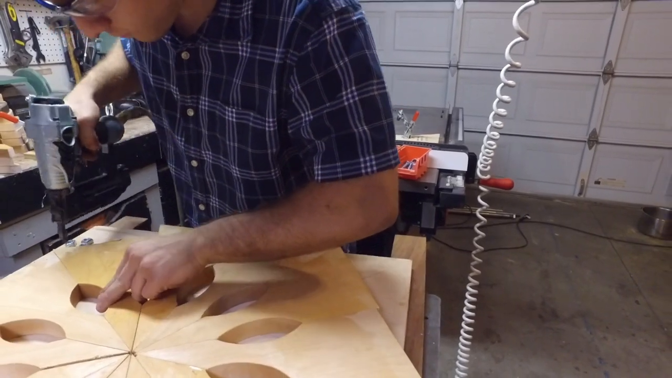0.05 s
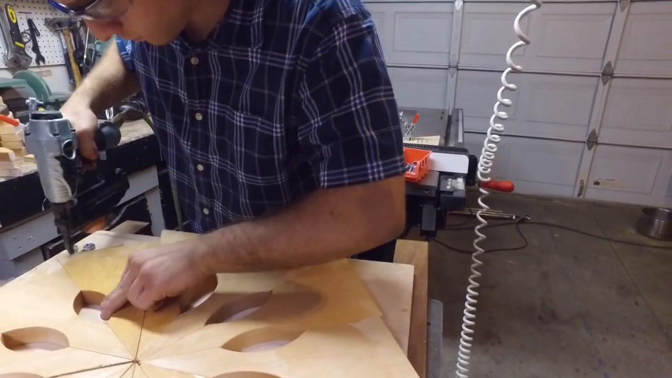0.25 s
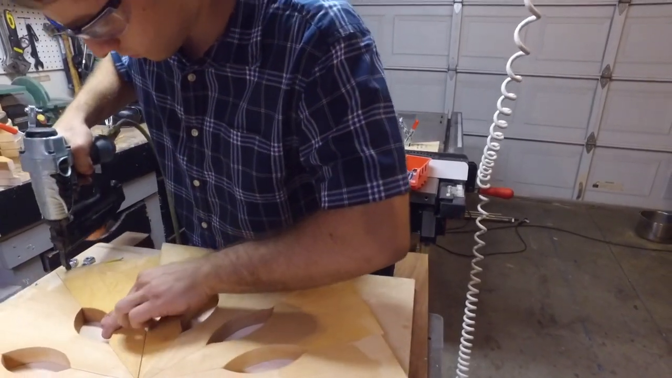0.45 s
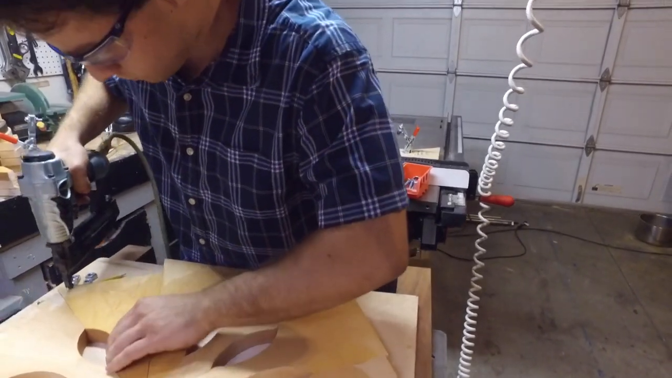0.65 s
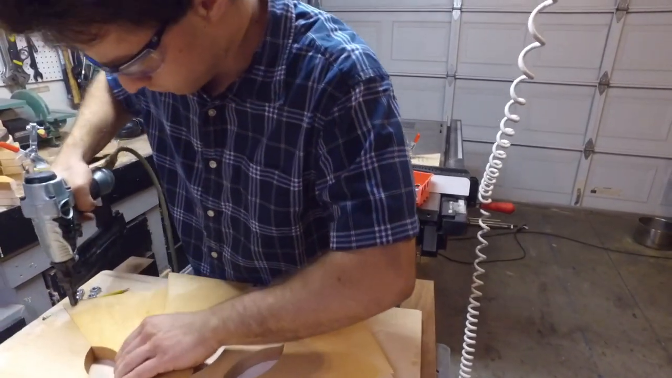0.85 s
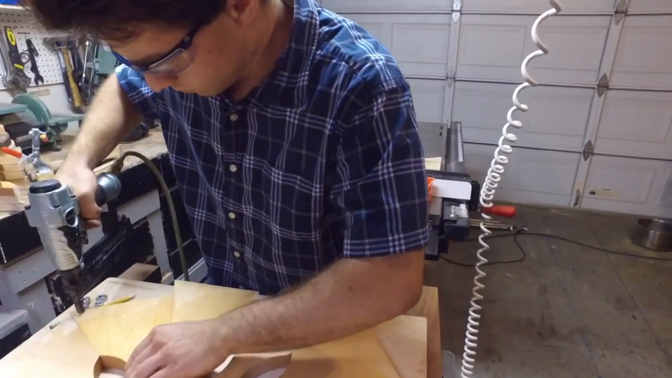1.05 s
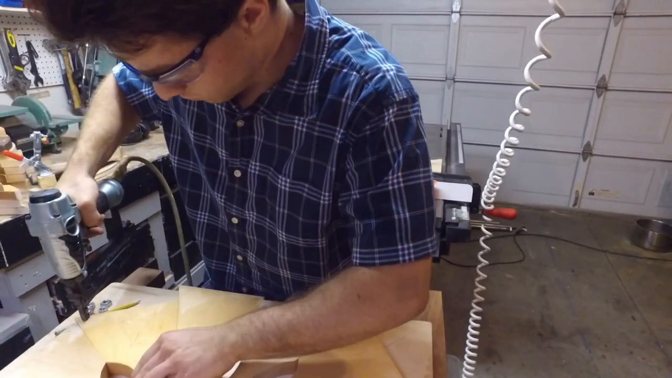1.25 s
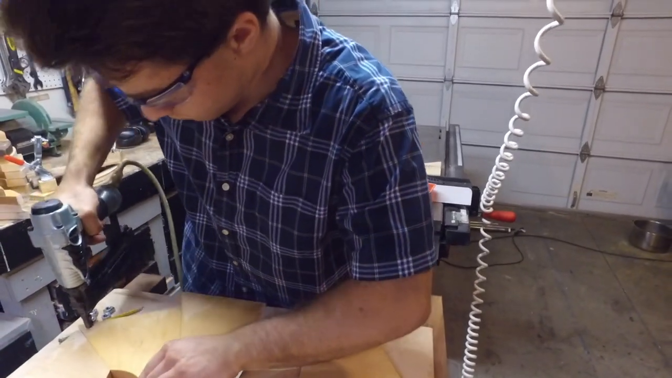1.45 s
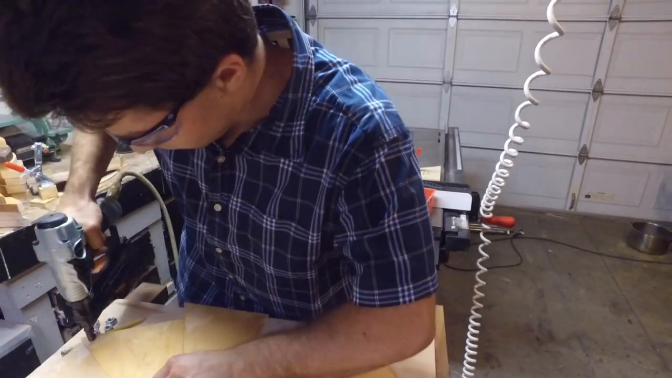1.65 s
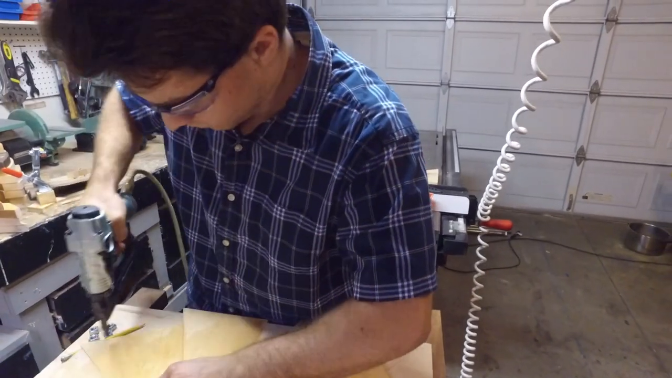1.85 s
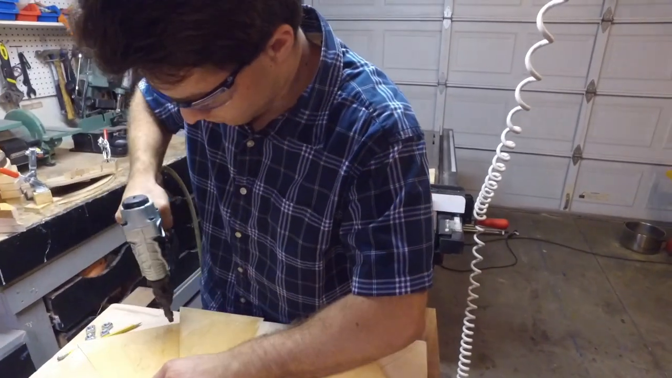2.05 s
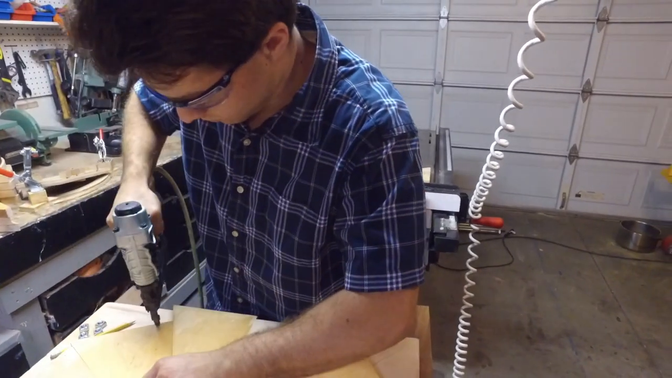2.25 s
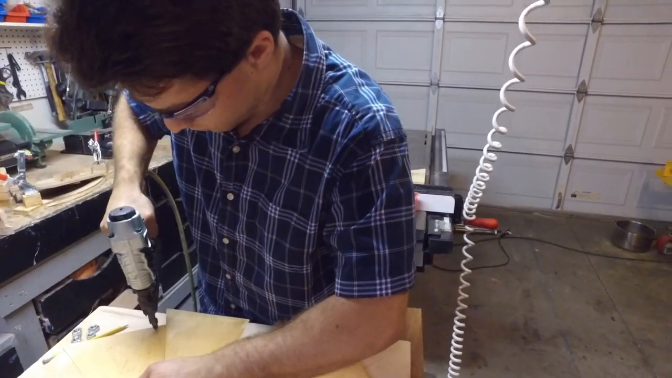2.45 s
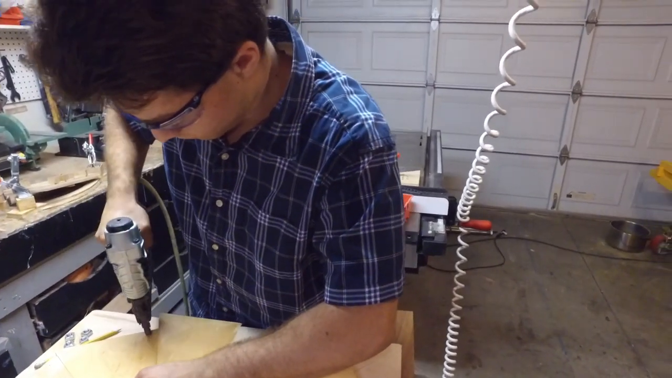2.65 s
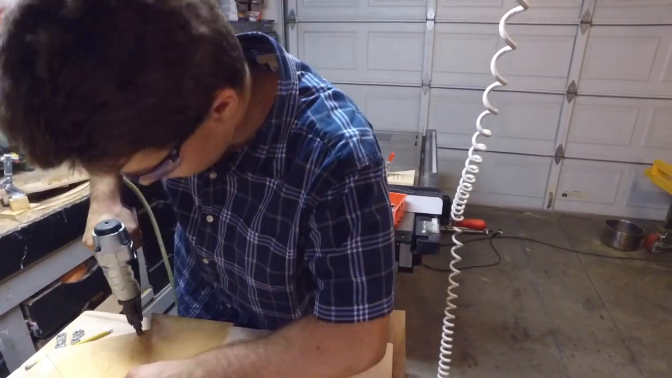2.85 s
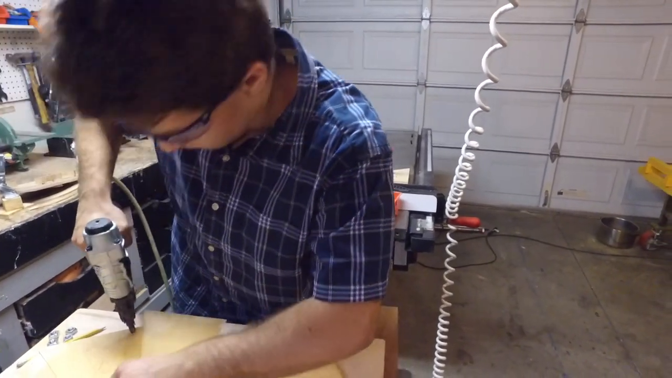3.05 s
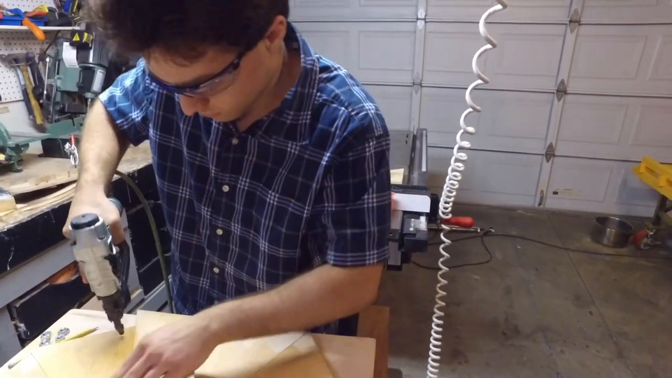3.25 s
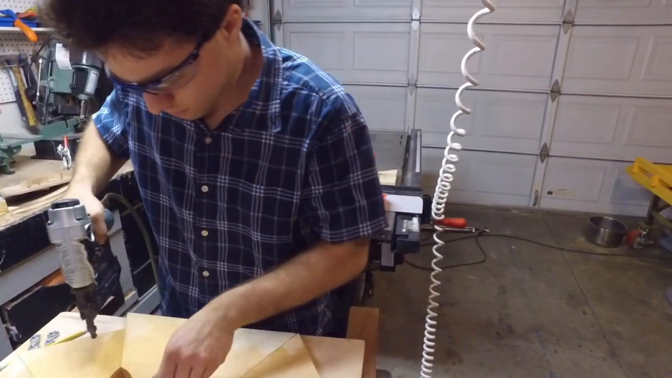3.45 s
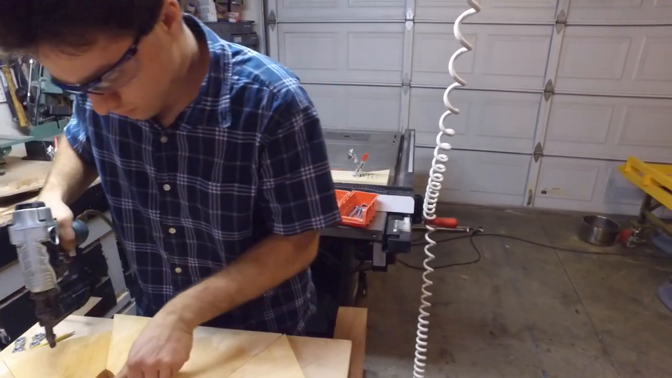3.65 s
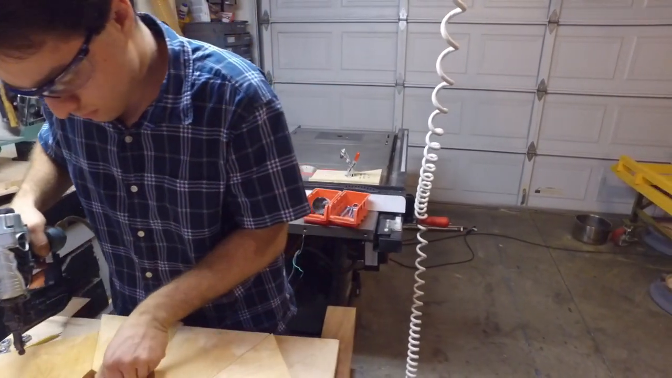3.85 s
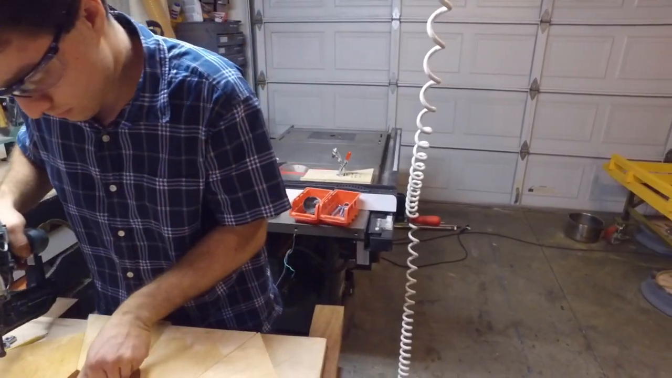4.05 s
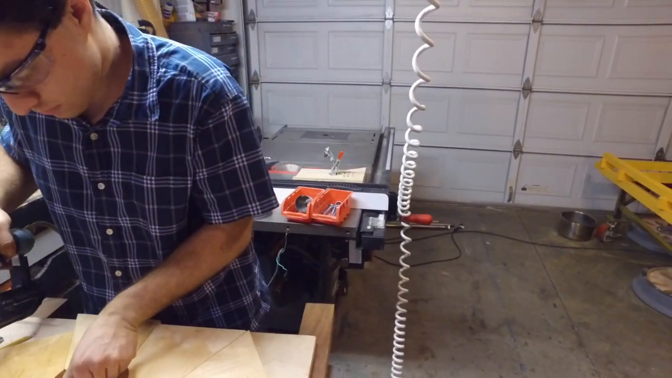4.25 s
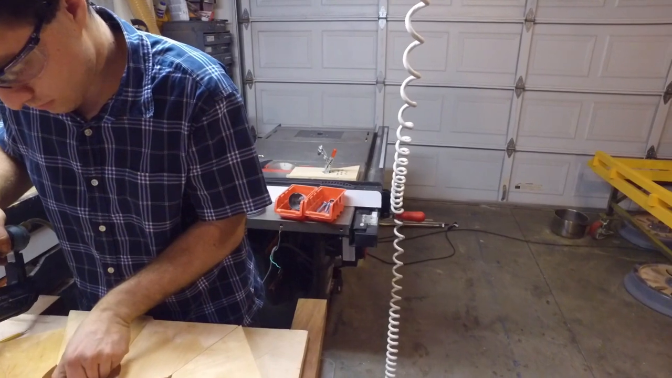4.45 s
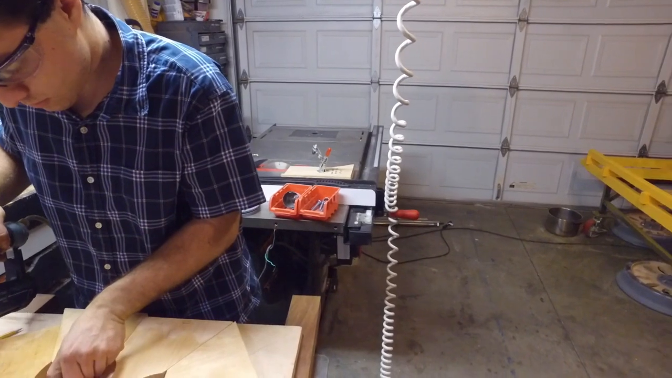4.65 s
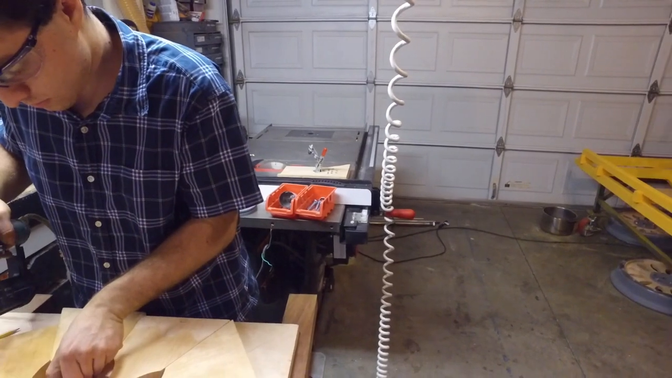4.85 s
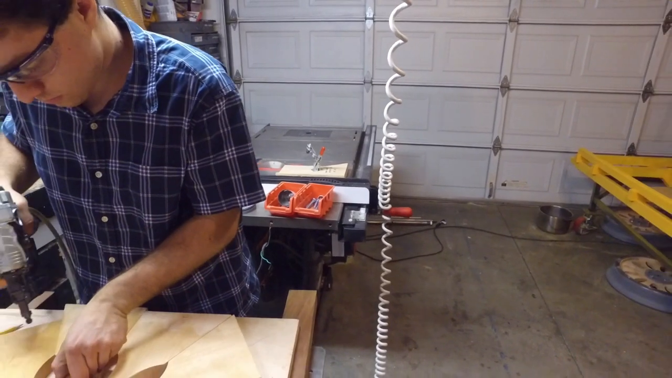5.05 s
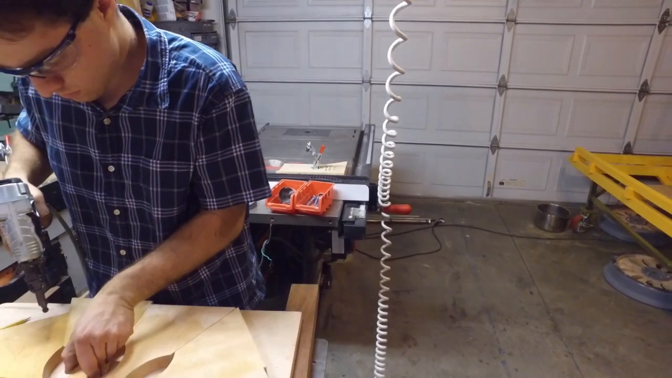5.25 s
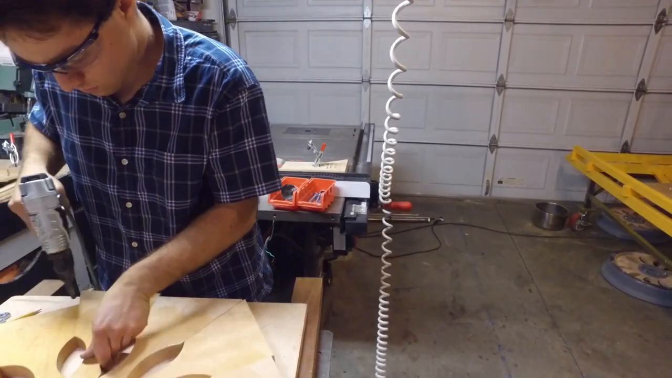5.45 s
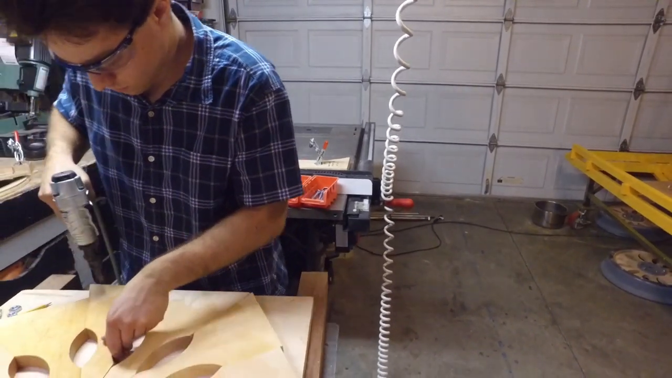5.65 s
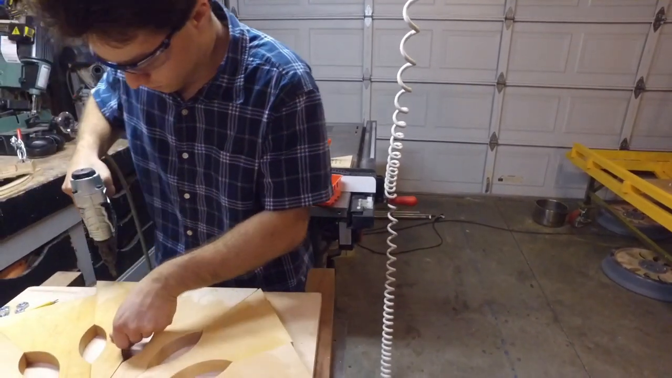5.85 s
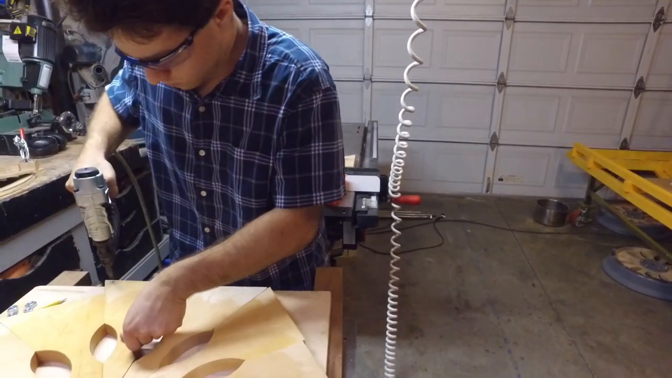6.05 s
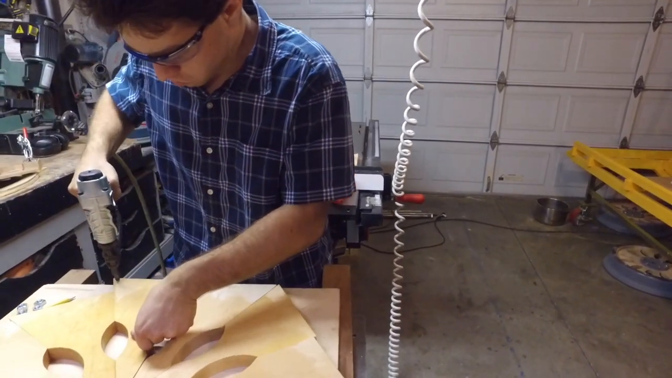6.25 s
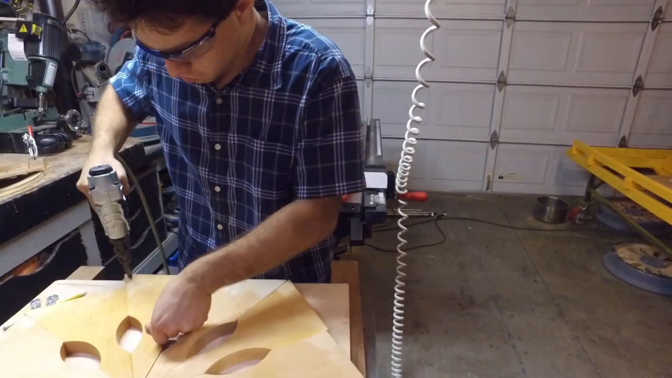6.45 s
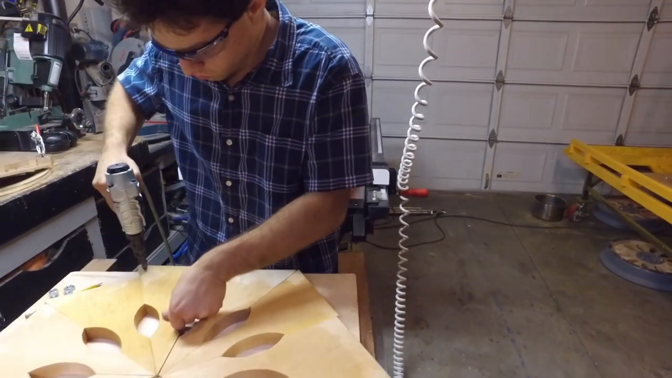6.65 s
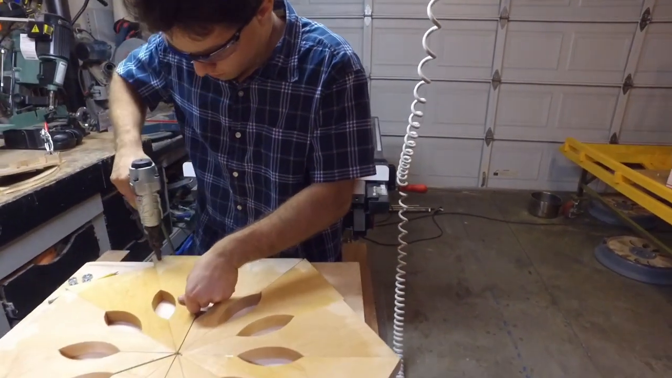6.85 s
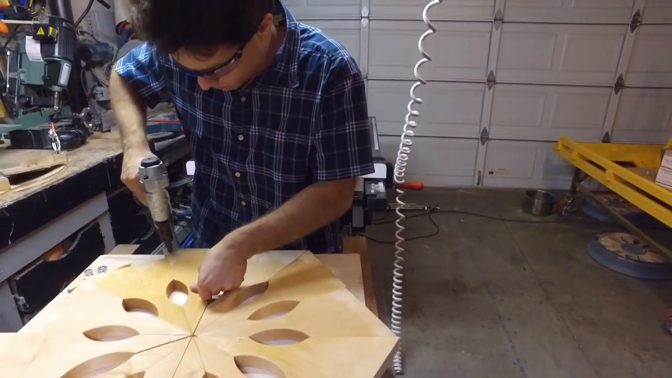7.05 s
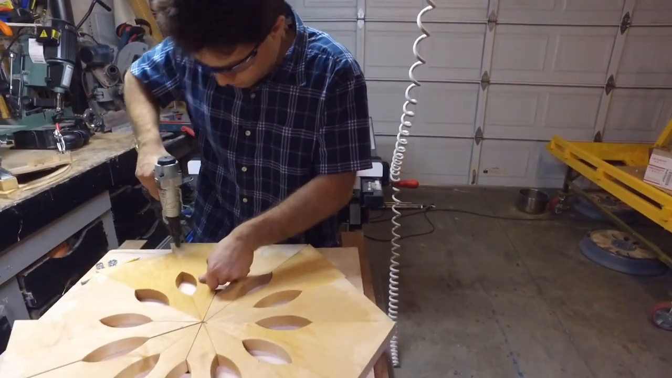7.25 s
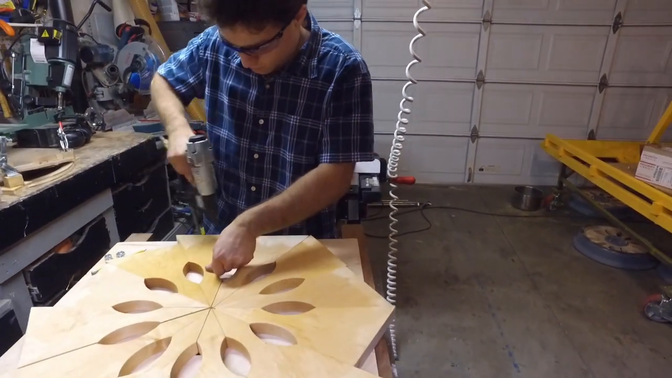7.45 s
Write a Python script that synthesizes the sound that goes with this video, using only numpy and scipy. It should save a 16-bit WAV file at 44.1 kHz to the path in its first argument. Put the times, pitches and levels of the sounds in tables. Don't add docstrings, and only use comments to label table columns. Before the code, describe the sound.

Quiet handling of wood and a faint distant motor hum, then a loud nailer bang with a double hit of slam and air release. A second shot follows over a second later, then a long quiet stretch of soft scrapes and knocks before the third, loudest shot. Close, mono, overdriven on the bangs, with a brief garage reverberation and low bench thuds.

```python
import sys
import numpy as np
from scipy import signal
from scipy.fft import rfft, irfft
from scipy.io import wavfile
from scipy.ndimage import uniform_filter1d

SR = 44100
rng = np.random.default_rng(int(sys.argv[2]) if len(sys.argv) > 2 else 0)


def level_to_linear(level):
    exponent = np.asarray(level, float) / 20
    return 10 ** exponent


def store_wav(level_fs):
    pcm = np.round(np.clip(np.atleast_2d(level_fs), -1, 1) * 32767)
    wavfile.write(sys.argv[1], SR, pcm.T.astype(np.int16))


N = 331191
TIME = np.arange(N) / SR

# hz, density_db (per Hz)
EXHAUST_AIR = [(300, -18), (1000, -8.5), (2500, -3), (4000, -1.5), (6000, 2), (8500, -3), (12000, -4.5),
               (16000, 1.5)]


def rms_one(x):
    return x / np.sqrt(np.mean(x ** 2) + 1e-20)


def at_hz(points, hz):
    points = np.array(points)
    return np.interp(np.log(hz + 1), np.log(points[:, 0]), points[:, 1])


def coloured(spectrum, size=N):
    hz = np.fft.rfftfreq(size, 1 / SR)
    white = rfft(rng.standard_normal(size))
    return rms_one(irfft(white * level_to_linear(at_hz(spectrum, hz)), size))


def treble(x, corner_hz):
    return signal.sosfilt(signal.butter(2, corner_hz, "high", fs=SR, output="sos"), x)


def drift(rate_hz):
    knots = rng.standard_normal(1000)
    return np.interp(TIME * rate_hz, np.arange(1000), knots)


def ring(hz, t60, size=6000):
    t = TIME[:size]
    return np.sin(2 * np.pi * hz * t) * level_to_linear(-60 * t / t60)


def burst(rise_s, hold_s, t60, size=6000):
    t = TIME[:size]
    return np.minimum(t / rise_s, 1) * level_to_linear(-60 * np.maximum(t - hold_s, 0) / t60)


def add(out, s, x):
    i = round(s * SR)
    out[i:i + len(x)] += x[:len(out) - i]


def nail_gun():
    # slam_s, slam_db, vent_s, vent_db, crack_db (slam above 2.5 kHz)
    shots = [
        (1.6217, 10, 1.7595, -2.5, 0.5),
        (2.970, 10, 3.087, -3, -1),
        (7.2061, 11, 7.322, 0, -1),
    ]
    # piston_home_s, home_knock_db, bench_shove_db, leak_db (while the trigger is held)
    recoils = [
        (1.7942, -6.5, -3.5, -4.5),
        (3.119, -5, -11.5, -8),
        (7.345, -3.5, -9.5, -25),
    ]
    # hz, level_db (against the slam), t60_s
    nail_spots = [
        (2690, -5.5, 0.15),
        (474, -3.5, 0.12),
        (434.4, -4, 0.05),
    ]
    # hz, density_db (per Hz)
    slam_spectrum = [(40, -24), (150, -24), (400, -3), (1000, 0.5), (2000, 1), (3200, -3.5), (6000, -12),
                     (10000, -25), (16000, -26.5)]
    # hz, level_db, t60_s
    squeal_modes = [(2630, 9, 0.014), (5370, 2, .01)]
    # hz, level_db, t60_s
    piston_modes = [(423, 1, 0.032), (480, -1, 0.026), (250, -6, 0.015), (123.9, -13.5, 0.044),
                    (630, -5, 0.013), (1813, 5, 0.0066), (2800, 11, 0.0089)]
    # hz, level_db, t60_s
    shove_modes = [(21.77, -2.5, 0.39), (59.4, -4.5, 0.14), (116.3, -8.5, 0.18)]

    lead = 0.0065
    last_air = EXHAUST_AIR[:-1] + [(16000, -16.5)]
    out = np.zeros(N)
    for shot_row, recoil_row, spot_row in zip(shots, recoils, nail_spots):
        slam_s, slam_db, vent_s, vent_db, crack_db = shot_row
        home_s, home_db, shove_db, leak_db = recoil_row
        spot_hz, spot_db, spot_t60 = spot_row
        vent, home = lead + vent_s - slam_s, lead + home_s - slam_s
        shot = np.zeros(36000)
        close = np.zeros(36000)

        add(shot, 0, level_to_linear(-27) * coloured(EXHAUST_AIR, size=300) * np.linspace(0.3, 1, 300))
        add(shot, lead - 0.0018, -level_to_linear(-20.5) * puff(0.0015))

        cracking = [(hz, db + crack_db * (hz > 2500)) for hz, db in slam_spectrum]
        slam = coloured(cracking, size=6000) * burst(0.00044, 0.0066, 0.08)
        add(shot, lead, level_to_linear(slam_db) * slam)
        add(shot, lead, level_to_linear(slam_db + spot_db) * ring(spot_hz, spot_t60))
        leak = coloured(EXHAUST_AIR, size=8000) * burst(0.081, vent_s - slam_s, 0.027, size=8000)
        add(shot, lead, level_to_linear(leak_db) * leak)

        add(close, vent, level_to_linear(vent_db - 5) * struck(squeal_modes) * burst(0.001, 0.0026, 0.003))
        add(close, vent + 0.0027, level_to_linear(vent_db + 10) * puff(0.0015))
        jet = coloured(EXHAUST_AIR, size=6000) * burst(0.003, home_s - vent_s, 0.039)
        add(shot, vent + 0.004, level_to_linear(vent_db) * jet)

        bleed = coloured(last_air, size=12000) * burst(0.01, 0.0087, 0.296, size=12000)
        add(shot, home, level_to_linear(vent_db - 10.5) * bleed)
        add(close, home, level_to_linear(-5) * puff(0.0012))
        add(shot, home, level_to_linear(home_db) * struck(piston_modes, spread_db=2.0))

        echo = garage(level_to_linear(-3.5) * shot + level_to_linear(-17.5) * close)
        add(out, slam_s - lead, shot + close + echo)
        shove = sum(level_to_linear(db) * ring(hz, t60, size=20000) for hz, db, t60 in shove_modes)
        add(out, slam_s + 0.013, level_to_linear(shove_db) * shove)
    return out


def struck(modes, spread_db=0):
    luck = rng.standard_normal(len(modes))
    return sum(level_to_linear(db + spread_db * k) * ring(hz, t60) for (hz, db, t60), k in zip(modes, luck))


def puff(width_s):
    t = TIME[:1500] / width_s
    suction = np.sin(np.pi * np.clip((t - 1) / 3, 0, 1))
    return np.sin(np.pi * np.minimum(t, 1)) - 0.033 * suction


def garage(x):
    # hz, t60_s
    echo_times = [(60, .4), (250, 0.297), (1000, 0.47), (3000, 0.38), (6000, 0.38), (10000, 0.26),
                  (16000, 0.089)]
    out = 0
    white = rng.standard_normal((2, len(x)))
    corners = 40 * 2 ** np.arange(0, 8.8, 0.4)
    for k, (low, high) in enumerate(zip(corners, corners[1:])):
        sos = signal.butter(2, [low, high], "band", fs=SR, output="sos")
        kept = level_to_linear(-120 / SR / at_hz(echo_times, np.sqrt(low * high)))
        energy = signal.sosfilt(sos, x + 1e-12) ** 2
        stored = signal.lfilter([1 - kept], [1, -kept], energy)
        built = uniform_filter1d(stored, size=301, origin=150)
        out = out + np.sqrt(np.abs(built)) * rms_one(signal.sosfilt(sos, white[k % 2]))
    return out


def touches():
    # start_s, tick_db, ring_hz, hardness_db
    contacts = [(0.2199, -53.5, 2250, 8), (0.3277, -29.5, 2820, -17), (0.4382, -43.5, 2270, -4),
                (0.475, -42, 3420, -6), (0.485, -37.5, 3380, -9), (0.6535, -47, 2250, 3),
                (0.9694, -47, 2750, -6), (1.1504, -49, 3900, 0), (1.1786, -30, 3020, -1),
                (1.3448, -39.5, 2850, 1), (1.582, -34.5, 4140, 4), (2.3099, -30.5, 2804, 4.5),
                (2.506, -27, 2800, 3), (2.5188, -36, 2800, 2), (2.6279, -42.5, 2860, -3),
                (2.6421, -28.5, 2780, -0.5), (2.9195, -50, 2270, 7), (3.2962, -20, 2800, 4),
                (6.1983, -34, 2870, 5), (6.2109, -37, 3150, 0), (6.4514, -35, 2520, -1.5),
                (6.536, -42, 2740, -5), (6.675, -45, 3750, -5), (6.7461, -37.5, 2760, -2),
                (7.1575, -40.5, 2800, 0)]
    # start_s, knock_db, knock_hz (panel), thud_db, thud_hz (bench)
    wood_knocks = [(0.326, -43, 1400, -40, 390), (0.437, -42.5, 840, -50, 250), (0.484, -43, 706, -31, 483),
                   (0.967, -42.5, 1390, -54, 262), (1.179, -32, 1250, -38, 560),
                   (1.345, -45, 1040, -59, 556), (2.312, -41.5, 910, -42, 270),
                   (2.51, -38.5, 1167, -38, 519), (2.643, -25, 867, -19.5, 124.2),
                   (3.294, -25.5, 1820, -35, 420), (6.195, -50, 936, -40.5, 272),
                   (6.45, -37.5, 1500, -39.5, 328), (6.541, -49.5, 781, -38, 317),
                   (6.747, -32.5, 1390, -30, 324)]
    # hz, density_db (per Hz)
    tick_spectrum = [(1200, -20.5), (2200, -4), (3800, 3.5), (5000, -15.5), (8000, -33)]
    # hz, density_db (per Hz)
    upper_spectrum = [(3000, -22), (4800, 2), (7500, -7.5), (9500, -16.5), (14000, -26)]
    # hz, level_db, t60_s
    panel_modes = [(1020, -3, 0.062), (1310, 0.5, 0.031), (1610, -1, 0.016), (770, -4, 0.0083)]
    # hz, level_db, t60_s
    bench_modes = [(149.5, -4.5, 0.033), (75, -3, .1), (335, -2, 0.077), (450, -2, 0.087),
                   (621, -15, 0.048)]

    out = np.zeros(N)
    for s, tick_db, ring_hz, hard_db in contacts:
        upper_db = tick_db - 11 + hard_db
        snap_db = tick_db - 20.5 + 1.1 * hard_db
        contact = burst(0.00028, 0.0013, 0.019)
        tick = 0.81 * ring(ring_hz, 0.033) + 0.47 * ring(ring_hz, 0.025)
        tick += 0.49 * coloured(tick_spectrum, size=6000) * contact
        upper = coloured(upper_spectrum, size=6000) * contact
        snap = coloured(EXHAUST_AIR, size=6000) * burst(0.00026, 0.0005, 0.016)
        add(out, s, level_to_linear(tick_db - 6.0) * tick + level_to_linear(upper_db) * upper + level_to_linear(snap_db) * snap)

    thud_rise = np.minimum(TIME[:6000] / 0.005, 1)
    for s, knock_db, knock_hz, thud_db, thud_hz in wood_knocks:
        knock = ring(knock_hz, 0.05) + 0.68 * struck(panel_modes, spread_db=3.5)
        thud = thud_rise * (ring(thud_hz, 0.07) + 0.6 * struck(bench_modes, spread_db=3))
        add(out, s, -level_to_linear(knock_db - 2.5) * knock)
        add(out, s + 0.001, -level_to_linear(thud_db) * thud)
    return out


def slides():
    # full_speed_s, held_s, rub_db, brightness_db
    strokes = [(0.69, 0.01, -55.5, 9), (0.763, 0.051, -35.5, 2), (2.85, 0.05, -50, 5.5),
               (3.7, .5, -70.5, 7.5), (5.48, 0.078, -50.5, 6), (5.583, 0.0019, -39.5, 5),
               (5.645, .01, -45.5, 4.5), (5.91, 0.0065, -53.5, 5), (6.345, .01, -58, 7.5),
               (6.644, 0.029, -45, 9), (7.16, .04, -57, 2.5)]
    # hz, density_db (per Hz)
    rub_spectrum = [(180, -49), (300, 2), (470, -13), (546, -8.5), (1040, 2.5), (1430, -1.5), (1750, 4),
                    (4590, 0.5), (14200, -29.5), (16000, -59)]
    speed_up, slow_down = 227.5, 210.5

    rub = ragged(coloured(rub_spectrum)) * level_to_linear(1.2 * drift(90) + 0.8 * drift(25))
    bright = treble(rub, 4500)
    power, upper = np.zeros(N), np.zeros(N)
    for s, hold_s, rub_db, bright_db in strokes:
        before_s = np.maximum(s - TIME, 0)
        after_s = np.maximum(TIME - s - hold_s, 0)
        stroke = level_to_linear(rub_db - (speed_up * before_s + slow_down * after_s))
        power += stroke ** 2
        upper += (stroke * (level_to_linear(bright_db) - 1)) ** 2
    return np.sqrt(power) * rub + np.sqrt(upper) * bright


def ragged(x):
    out = np.zeros(N)
    corners = 150 * 2.0 ** np.arange(8)
    for low, high in zip(corners, corners[1:]):
        sos = signal.butter(1, [low, min(high, 20000)], "band", fs=SR, output="sos")
        out += level_to_linear(2.2 * drift(35)) * signal.sosfilt(sos, x)
    return rms_one(out)


def room_tone():
    # hz, density_db (per Hz)
    air_spectrum = [(12, -36.5), (20, 6.5), (102, -13), (134, -36.5), (181, -19), (196, -23), (244, -12),
                    (280, -17.5), (567, -18.5), (877, -22.5), (1090, -24), (1180, -25.5), (2270, -34.5),
                    (2530, -33.5), (13300, -59.5)]
    # time_s, level_db
    motor_load = [(0.0, -53), (0.65, -54), (1.5, -54), (3.6, -53), (5.3, -55.5), (5.6, -54), (6.64, -51.5),
                  (7.1, -54)]
    # pitch_hz, level_db
    hum_lines = [(59.2, -51), (129.2, -56), (172.3, -59), (236.9, -59.5), (258.4, -64), (559.9, -72),
                 (586.8, -63), (710.6, -72.5), (829.0, -69), (947.5, -65), (1066, -65.5), (1125, -67),
                 (1362, -69.5), (2245, -75), (2659, -84.5), (2955, -77)]
    # centre_hz, width_hz, level_db, change_db_per_s
    bearing_bands = [(2250, 73, -66, -0.03), (3900, 35, -70, -1.16), (5450, 250, -76, 0)]
    rotor_hz = 59.2

    pulse = 1 + 0.39 * np.sin(4 * np.pi * rotor_hz * TIME)
    air = coloured(air_spectrum) * pulse * level_to_linear(0.54 * drift(12))
    load_db = np.interp(TIME, *np.transpose(motor_load))
    hiss_lift_db = 2.3 + 0.76 * (load_db - load_db.mean())
    air = air + (level_to_linear(hiss_lift_db) - 1) * treble(air, 2500)
    out = air * level_to_linear(load_db + 7.5) + draught()
    for hz, db in hum_lines:
        wobble = (0.5 + 110 / hz) * drift(11)
        out += level_to_linear(db + 2.0 + 2.7 * drift(7.3)) * np.sin(2 * np.pi * hz * TIME + wobble)
    for hz, width_hz, db, db_per_s in bearing_bands:
        b, a = signal.iirpeak(hz, hz / width_hz, SR)
        out += level_to_linear(db + db_per_s * TIME) * rms_one(signal.lfilter(b, a, rng.standard_normal(N)))
    return signal.sosfilt(signal.cheby2(8, 40, 14400, fs=SR, output="sos"), out)


def draught():
    # start_s, level_db
    air_blasts = [
        (1.629, 1),
        (1.77, -20),
        (2.99, -36),
        (3.089, -17),
        (7.22, -35),
        (7.34, -20),
    ]
    # hz, density_db (per Hz)
    gust_spectrum = [(10, -5.5), (20, 8), (40, -6.5), (80, -17), (150, -53)]
    rise_s, hold_s = 0.0067, 0.012

    strength = level_to_linear(-44.5 + 2 * drift(20))
    for s, db in air_blasts:
        push = level_to_linear(db) * burst(rise_s, rise_s + hold_s, 0.18, size=30000)
        wake = level_to_linear(-35) * burst(rise_s, 0, 1.61, size=30000)
        add(strength, s, push + wake)
    return level_to_linear(-3.5) * strength * coloured(gust_spectrum)


def scene():
    small = touches() + slides()
    mix = nail_gun() + small + level_to_linear(-3.5) * garage(small) + room_tone()
    return np.array([mix, mix])


def roll_off(x):
    return signal.sosfilt(signal.butter(12, 16640, fs=SR, output="sos"), x)


def record(dry):
    ceiling, knee, lift = 0.56, 5.0, 0.25
    dulled = signal.lfilter([1 - lift], [1, -lift], dry[0])
    clipped = dulled / (1 + np.abs(dulled / ceiling) ** knee) ** (1 / knee)
    overdrive = np.tanh(0.71 * uniform_filter1d(np.abs(dulled - clipped), size=400))
    lifted = signal.lfilter([1, -lift], [1 - lift], clipped) * level_to_linear(-2.5 * overdrive)
    buzzing = lifted + level_to_linear(-18.5) * overdrive * rng.standard_normal(N)
    cut = signal.sosfiltfilt(signal.cheby2(10, 24, 15650, fs=SR, output="sos"), buzzing)
    return roll_off(np.array([cut, cut]))


dry = scene()
out = record(dry)
store_wav(out)
```